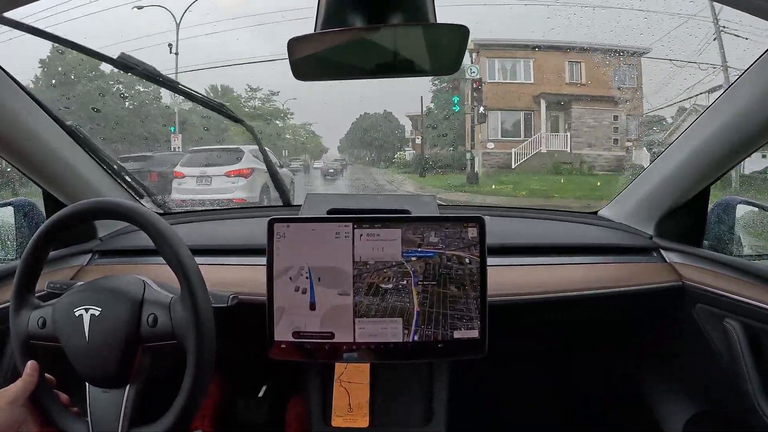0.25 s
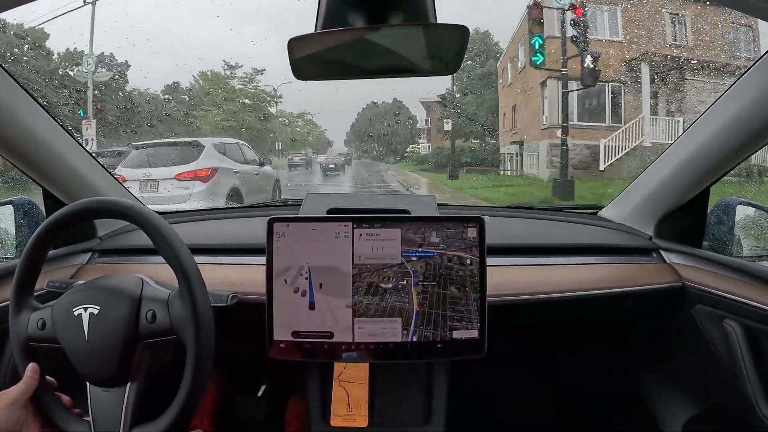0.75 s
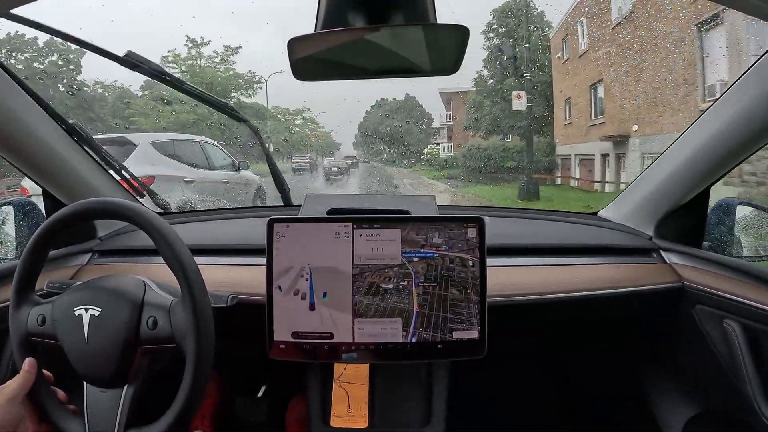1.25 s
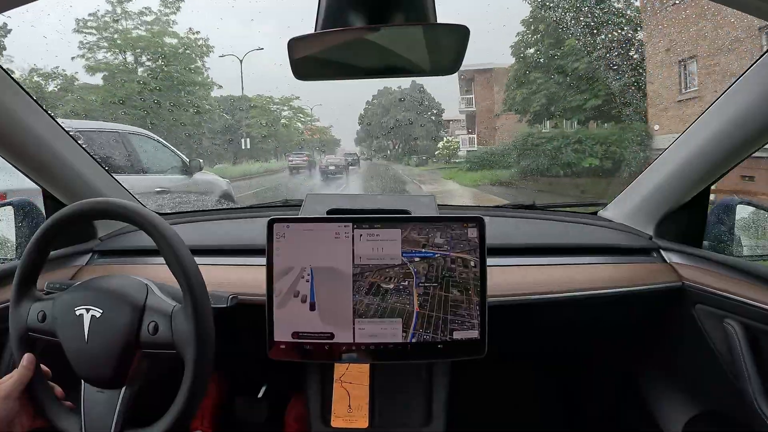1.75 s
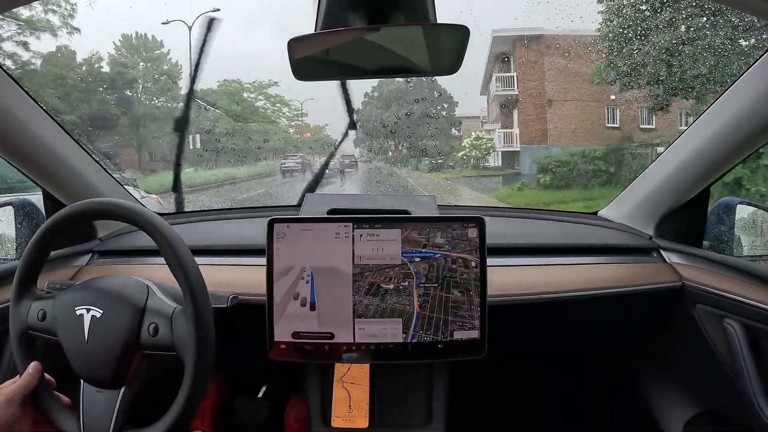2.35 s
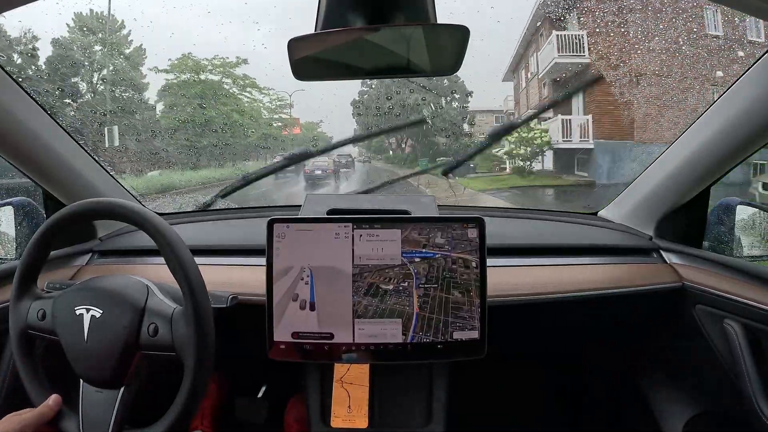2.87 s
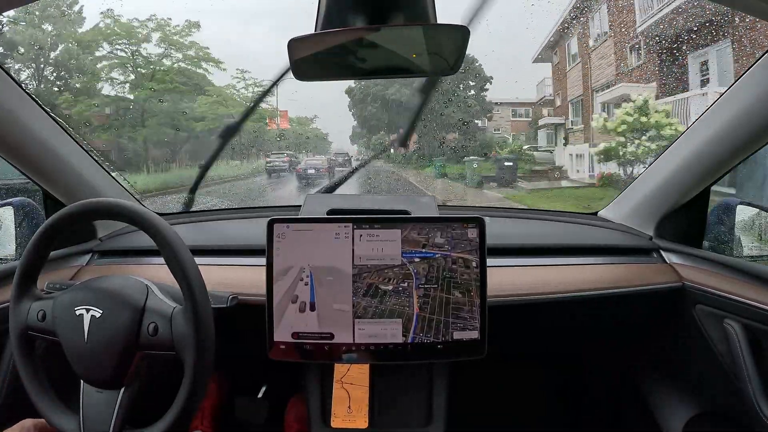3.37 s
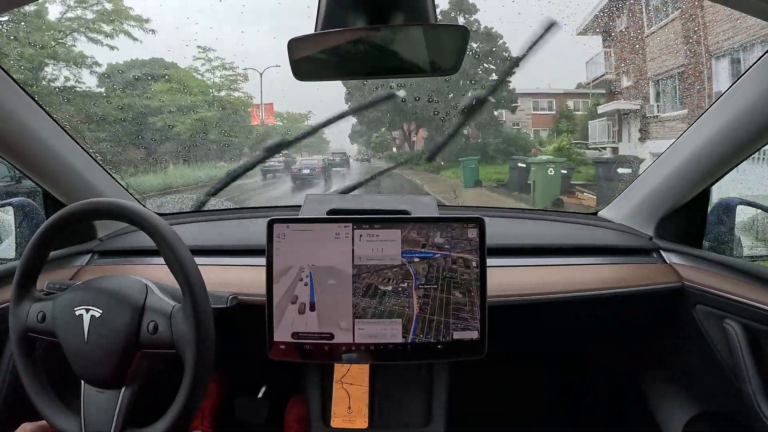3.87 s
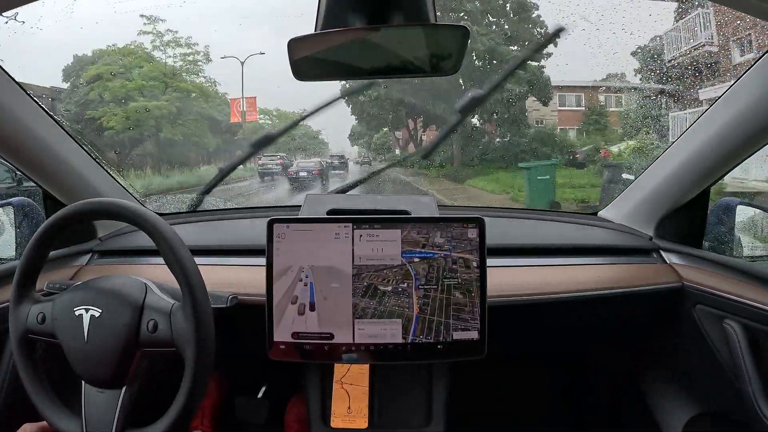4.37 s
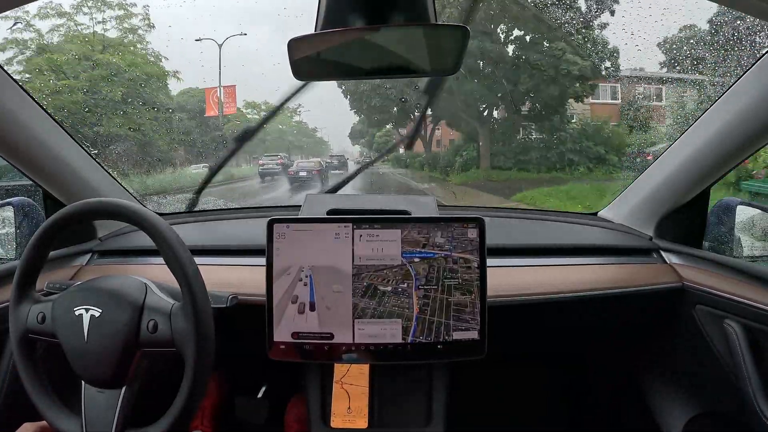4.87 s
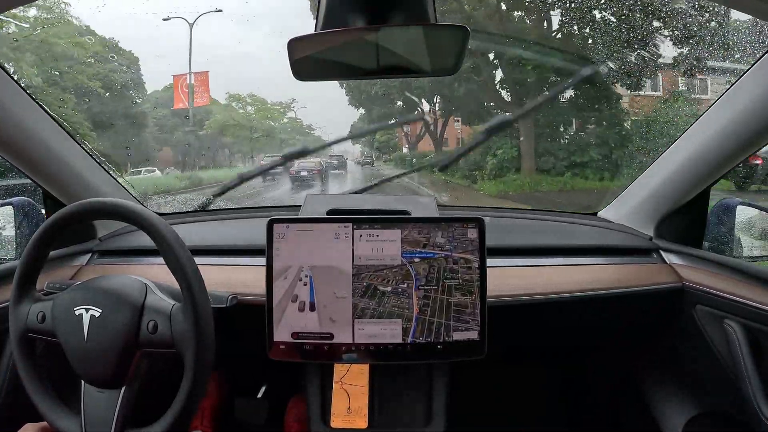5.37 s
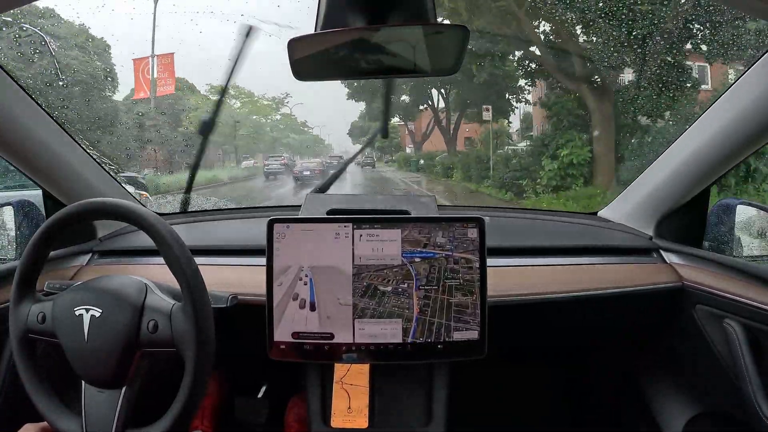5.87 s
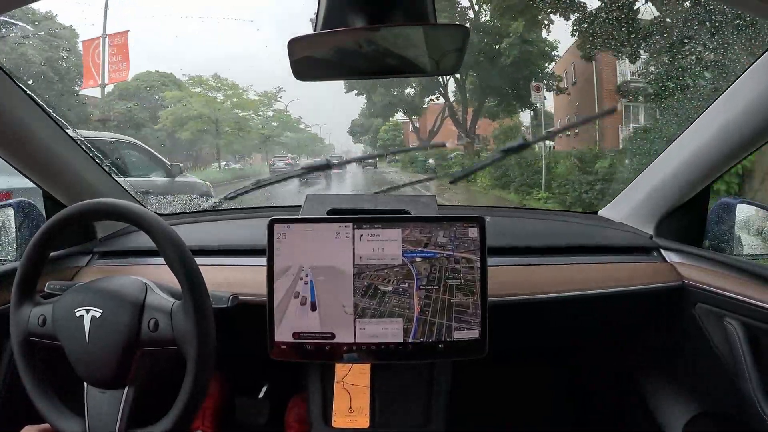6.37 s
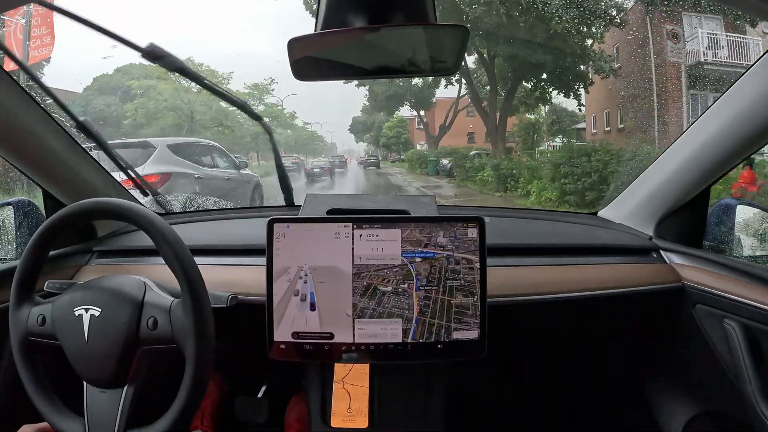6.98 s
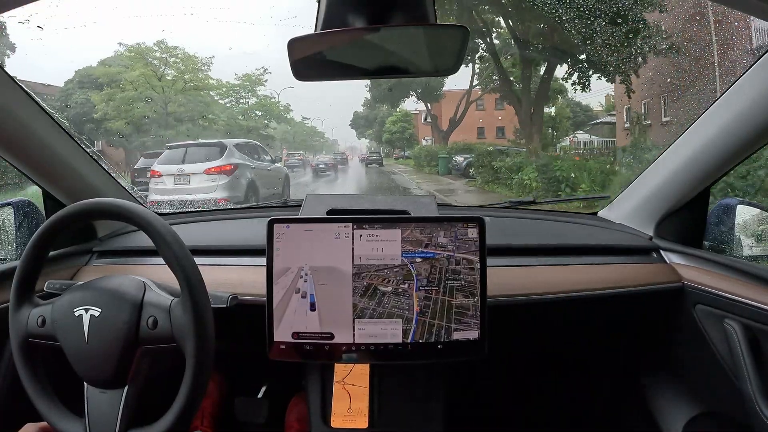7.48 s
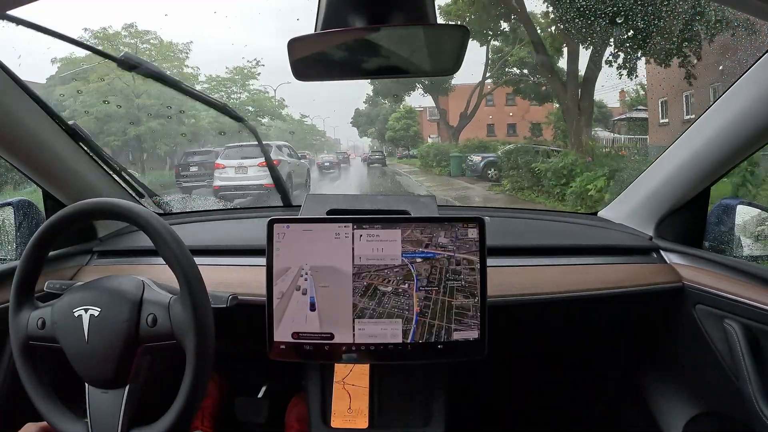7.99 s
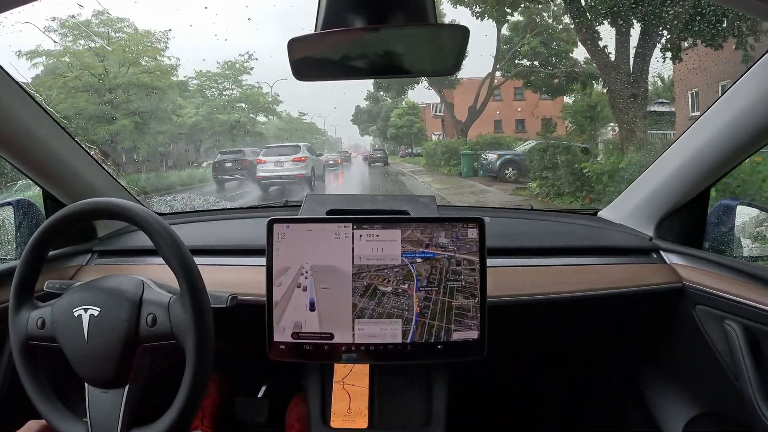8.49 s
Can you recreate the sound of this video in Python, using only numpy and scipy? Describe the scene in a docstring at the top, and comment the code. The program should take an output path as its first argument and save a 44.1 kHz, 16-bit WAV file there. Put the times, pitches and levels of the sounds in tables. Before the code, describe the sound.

From the start, a deep, throbbing boom and tyre roar fill an electric car in heavy rain, heard from between the front seats. Above the rumble, wet tyres hiss and fine rain sizzles on the windscreen. The wipers turn about every half second throughout, alternating a soft thud and a knock with a dull rubber scuff, stronger after 3 seconds. A road seam thumps through the floor at 1.7 seconds and the boom swells. From 5 to 6.5 seconds a subtle tyre hum sinks as the car slows. Between 6.4 and 7.2 seconds the fine rain thins under a tree and fat drops splat on the glass, while two seam thumps and small trim knocks land around 7 seconds. The rain is quietest near 7.5 seconds, then builds again. A very faint, high drive whine grows slowly, and a light bump with trim knocks comes at about 8.7 seconds.

```python
"""A low boom and a tyre roar fill an electric car driving through heavy rain, as the road shakes its cabin.
Wet tyres hiss, fine rain sizzles on the windscreen and the wipers thud softly at each turn.
Seams in the road thump through the floor, the trim knocks and the drive whines faintly.
Under a tree the fine rain thins out and fat drops splat on the glass; the tyre hum sinks as the car slows.
"""
import sys
import numpy as np
from scipy import signal
from scipy.fft import rfft, irfft, next_fast_len
from scipy.io import wavfile
from scipy.ndimage import uniform_filter1d, minimum_filter1d

SR = 44100
rng = np.random.default_rng(int(sys.argv[2]) if len(sys.argv) > 2 else 0)


def int16_out(signal):
    """Quantize to a 16-bit WAV file."""
    q = np.round(np.clip(np.atleast_2d(signal).T, -1, 1) * 32767)
    wavfile.write(sys.argv[1], SR, q.astype(np.int16))


N = 385434
TIME = np.arange(N) / SR

# Relative levels of the water on the road and on the glass: time_s, spray_db, rain_db
WATER_LEVELS = [(0.0, -41, -47), (0.07, -52, -53), (0.22, -52.5, -57), (0.45, -51, -53),
                (0.7, -50.5, -51.5), (0.93, -50.5, -53), (1.08, -49.5, -50), (1.35, -50, -52.5),
                (1.65, -50.5, -52), (2.33, -53, -55), (2.8, -49, -53), (2.95, -50.5, -53),
                (3.12, -48.5, -50.8), (3.55, -50.5, -54), (3.88, -48, -51.5), (4.1, -48.5, -51.5),
                (4.35, -46.5, -50), (4.58, -49, -54), (5.7, -48, -53.5), (6.22, -48.5, -55),
                (6.38, -52, -57), (6.8, -52.5, -56), (7.27, -52.5, -57.5), (7.36, -55, -63.5),
                (7.49, -54, -66), (7.63, -53, -61.5), (7.95, -51, -58), (8.55, -50.3, -58),
                (8.74, -48.5, -55.5)]
# Wiper reversals, top and foot of the sweep by turns: time_s, strength_db, cutoff_hz, other_blade_lag_s
WIPER_REVERSALS = [(0.449, -29, 500, .014), (0.958, -31, 600, -0.012), (1.427, -28, 500, -.017),
                   (1.916, -42, 500, .014), (2.389, -30.5, 360, .014), (2.85, -33, 800, .014),
                   (3.365, -25.5, 520, -.013), (3.829, -30, 550, 0.021), (4.334, -21, 380, -.016),
                   (4.779, -26, 800, -0.011), (5.313, -20, 320, .035), (5.74, -26, 600, 0.011),
                   (6.288, -23.5, 540, -.008), (6.68, -26.5, 650, 0.019), (7.262, -27, 380, .014),
                   (7.687, -25.5, 600, 0.017), (8.226, -21.5, 340, -.012), (8.668, -30, 694, -.014)]


def road(boom_db=-22, roar_trim_db=-1, drone_trim_db=-1, waver_db=1.5, attack_s=.058, release_s=.077):
    """Forced vibration: the uneven road makes the cabin air boom, the tread roar and the panels drone."""
    # Rough stretches that pump the air mode: start_s, length_s, level_db
    rough_patches = [(0.0, 0.205, -14.5), (0.406, 0.03, -19), (1.159, 0.11, -15.3), (1.735, 0.58, -17),
                     (2.994, 0.033, -22), (3.287, 0.058, -15.5), (4.475, 0.57, -25), (6.217, 0.14, -17.5),
                     (6.475, 0.82, -20.5)]
    # Smooth stretches where the boom sinks: start_s, length_s, change_db
    smooth_patches = [(1.4, .04, -5), (2.46, 0.19, -4), (3.197, 0.03, -12), (7.422, 0.51, -3.5)]
    # Coarseness of the surface, as relative levels: time_s, roar_db, drone_db
    coarseness = [(0.0, -25, -36.5), (0.12, -34, -43.5), (0.3, -36.5, -46), (0.7, -35.5, -45),
                  (1.0, -33.5, -45), (1.7, -34, -40), (2.1, -36.5, -45.5), (2.7, -36, -41.5),
                  (4.35, -30.5, -41.5), (4.6, -33, -41), (5.5, -31.5, -42), (6.5, -30.5, -44.5),
                  (7.15, -33, -44), (7.42, -38.5, -47), (7.85, -32.5, -46.5), (8.45, -34, -44.5),
                  (8.74, -28, -42)]
    # Spectra of cabin air, tread and body panels: frequency_hz, density_db
    boom_spectrum = [(10, -24), (20, -4.5), (28, -1), (36, 3), (44, -1), (53, -12.5), (64, -15.5),
                     (76, -21.5), (95, -28.5), (130, -83.5), (2000, -140)]
    roar_spectrum = [(40, -32), (62, -8.5), (78, -2), (95, -3), (112, 1), (135, -3.5), (165, -8.5),
                     (210, -18), (320, -46), (600, -71), (4000, -140)]
    drone_spectrum = [(120, -14.5), (185, 1), (220, -1), (250, 1), (280, -3), (320, -1.5), (370, -9),
                      (440, -16), (600, -38), (1000, -42), (10000, -120)]
    pumping = sum(from_db(db) * envelope(s, length, attack_s, release_s)
                  for s, length, db in rough_patches)
    dip_db = sum(db * envelope(s, length, release_s, attack_s) for s, length, db in smooth_patches)
    roar_db, drone_db = in_time(coarseness)
    boom = noise(boom_spectrum)
    boom_power = uniform_filter1d(boom[0] ** 2, int(.16 * SR))
    boom = from_db(boom_db + dip_db) * boom / np.sqrt(boom_power + .0097)  # only quick throbs remain
    resonance = pumping * air_mode()
    roar = from_db(roar_db + roar_trim_db + waver_db * drift(4.8)) * noise(roar_spectrum)
    drone = from_db(drone_db + drone_trim_db + waver_db * drift(4.5)) * noise(drone_spectrum)
    return boom + resonance + roar + drone


def air_mode(pitch_hz=35, wander_hz=5, throb_db=1.2):
    """Cavity resonance: the cabin's lowest air mode, driven hard, wavers in pitch and strength."""
    phase = 2 * np.pi * np.cumsum(pitch_hz + wander_hz * drift(16)) / SR
    return unit_rms(from_db(throb_db * drift(6)) * np.sin(phase))


def seams(level_db=-2, tyre_cutoff_hz=220):
    """Impulse response: the soft tyre low-passes each blow from a seam; suspension and floor ring."""
    # Wheels dropping over seams: time_s, strength_db
    crossings = [(0.07, -39), (1.72, -19), (6.27, -32), (6.95, -23.5), (7.07, -19.5), (8.65, -30)]
    # Modes of suspension and floor: pitch_hz, gain_db, t60_s
    floor_modes = [(70, 1.5, 0.48), (102.4, -5, 0.15), (163, -13.5, 0.077)]
    blows = soften(clicks(crossings), tyre_cutoff_hz)
    return from_db(level_db) * sum(from_db(db) * ring(blows, hz, t60) for hz, db, t60 in floor_modes)


def spray(hiss_trim_db=2, wash_trim_db=2, wash_follows=.71, flutter_db=1, grain_db=-6):
    """Turbulence and impact noise: tyres cut the water film; the wheel-arch wash grows with the rain."""
    # Spectra of the spray and the duller wash: frequency_hz, density_db
    spray_spectrum = [(350, -35), (600, -7.5), (800, -5), (1000, 0.5), (1300, -2), (1750, -4), (2300, -8),
                      (2750, -8), (3400, -8), (4000, -9.5), (4500, -13.5), (7000, -26.5), (14000, -62)]
    wash_spectrum = [(150, -41.5), (330, -14.5), (420, -0.5), (490, 1.5), (570, -2), (640, -5), (760, -3.5),
                     (900, -7.5), (1200, -24), (2500, -49.5), (12000, -88.5)]
    spray_db, rain_db = in_time(WATER_LEVELS)
    wash_db = np.median(rain_db) + wash_follows * (rain_db - np.median(rain_db))
    droplets = unit_rms(in_cabin(drops(per_s=2000, spread_db=2.5), wet_db=-.5, t60=.05))
    excitation = rng.standard_normal((2, N)) + from_db(grain_db) * droplets
    hiss = from_db(spray_db + hiss_trim_db) * unit_rms(two_ears(excitation, spray_spectrum))
    flutter = from_db(flutter_db * drift(26))
    wash = from_db(wash_db + wash_trim_db) * noise(wash_spectrum)
    return flutter * (hiss + wash)


def rain(trim_db=3, drops_per_s=5000, gust_db=1.14, flurry_db=.5, shelter_db=-3.5):
    """Shot noise on the windscreen: heavier rain brings more and harder drops; a tree holds some back."""
    # Spectrum of fine drops on glass: frequency_hz, density_db
    rain_spectrum = [(400, -20.5), (1200, 1), (2500, -2.5), (4000, -2.5), (5300, 0.5), (6500, -2),
                     (7750, -4.5), (8100, -9.5), (9000, -11), (10000, -14.5), (11000, -23), (13000, -28),
                     (15500, -38)]
    _, rain_db = in_time(WATER_LEVELS)
    under_tree = envelope(start_s=6.42, length_s=.76, attack_s=.1, release_s=.1)
    rain_db = rain_db + shelter_db * under_tree
    vigour = from_db(rain_db - np.median(rain_db))
    impacts = np.sqrt(vigour) * drops(drops_per_s * vigour, spread_db=3.5)
    flurries = from_db(gust_db * drift(52) + flurry_db * drift(5.3))
    sizzle = two_ears(in_cabin(impacts * flurries, wet_db=0, t60=.094), rain_spectrum)
    overall_rms = from_db(trim_db) * np.sqrt(np.mean(from_db(rain_db) ** 2))
    return overall_rms * unit_rms(sizzle)


def wipers(trim_db=0, judder_db=-10, judder_t60=.08, left_db=.8):
    """Modal ringing: flipping blades judder and strike the glass, a thud at the top, a knock below."""
    # Modes of the windscreen at either end of the sweep: pitch_hz, top_db, foot_db, t60_s
    screen_modes = [(120, -1, 0, 0.07), (160, -1, -3, 0.04), (254, -0.5, -13, 0.06), (290, -4.5, -7, 0.05),
                    (392, -10, -15, 0.035), (508, -19, -9, 0.028), (635, -14, -11, 0.02),
                    (780, -19, -8, 0.02)]
    flips = [blade_flip(*turn) for turn in WIPER_REVERSALS]
    at_top, at_foot = sum(flips[0::2]), sum(flips[1::2])
    thud = 0
    for k, (hz, top_db, foot_db, t60) in enumerate(screen_modes):
        force = from_db(top_db) * at_top + from_db(foot_db) * at_foot
        thud = thud + (-1) ** k * ring(force, hz, t60)
    impulse = clicks([(.00045, .0059)])
    judder = np.array([echoes(impulse, judder_t60) for _ in range(2)])
    thud = thud + from_db(judder_db) * signal.fftconvolve(judder, thud[None], axes=1)[:, :N]
    return from_db(trim_db + np.array([[left_db], [-left_db]])) * thud


def blade_flip(time_s, strength_db, cutoff_hz, lag_s, other_blade_db=-6):
    """Soft contact: two blades flop over a moment apart, and the rubber rounds off each slap."""
    slaps = clicks([(time_s, strength_db), (time_s + lag_s, strength_db + other_blade_db)])
    return soften(slaps, cutoff_hz)


def scuffs(relative_db=-17.5, swell_s=.018):
    """Friction noise: around each turn the rubber brushes the wet glass in a brief, dull swell."""
    # Spectrum of rubber on wet glass: frequency_hz, density_db
    scuff_spectrum = [(70, -28), (170, -6), (270, 0), (340, -3), (450, -13), (750, -17), (1100, -29),
                      (3000, -65), (10000, -100)]
    swell = sum(from_db(db + relative_db) * np.exp(-np.abs(TIME - s) / swell_s)
                for s, db, _, _ in WIPER_REVERSALS)
    return swell * noise(scuff_spectrum)


def splats(trim_db=5.5, splash_db=-15.5):
    """Impact and splash: a fat drop cracks on the glass, then its droplets scatter for milliseconds."""
    # Fat drops, most of them from the tree: time_s, strength_db, scatter_s
    fat_drops = [(1.071, -34, .012), (4.587, -33, 0.029), (5.629, -35, .008), (6.436, -33, 0.013),
                 (6.464, -30, .008), (6.546, -34, .008), (6.556, -31.5, .013), (6.607, -33.5, 0.016),
                 (6.638, -31, 0.0065), (6.648, -35, .007), (6.667, -24.5, 0.0015), (6.683, -32, .007),
                 (6.695, -36, 0.013), (6.715, -34, 0.0052), (6.756, -40, 0.016), (6.786, -36, 0.0037),
                 (6.845, -37.5, 0.01), (6.861, -28.5, 0.0066), (6.932, -37, 0.0054), (6.985, -34.5, .004),
                 (6.995, -33.5, 0.015), (7.069, -34, 0.01), (7.093, -36, .01), (7.136, -31.5, 0.0073),
                 (7.149, -37, .004), (7.177, -33.5, .007), (7.228, -39, .025), (7.636, -37, .005)]
    # Spectrum of a splat: frequency_hz, gain_db
    splat_spectrum = [(300, -24), (800, 7.5), (1400, 8.5), (2400, 4), (4000, 4), (7500, 0), (8300, -6.5),
                      (10000, -12), (12000, -26), (16000, -29)]
    scatter = sum(from_db(db) * np.exp(-np.abs(TIME - s) / scatter_s) * (TIME >= s)
                  for s, db, scatter_s in fat_drops)
    splash = scatter * unit_rms(drops(per_s=9000, spread_db=1.8))
    impacts = clicks([(s, db) for s, db, _ in fat_drops]) + from_db(splash_db) * splash
    return two_ears(in_cabin(from_db(trim_db) * impacts, wet_db=-4, t60=.049), splat_spectrum)


def tread_hum(sag_per_s=.165, waver_hz=5, edge_s=.42):
    """Periodic excitation: the tread's wavering tones sink in proportion as the car slows."""
    # Tones of the tread: start_s, length_s, start_pitch_hz, level_db
    tread_tones = [(5.05, 1.42, 101.7, -34.5), (4.98, 0.37, 361, -51)]
    hum = 0
    for s, length, hz, db in tread_tones:
        phase = 2 * np.pi * np.cumsum(hz * (1 - sag_per_s * (TIME - s))) / SR
        tone = drift(waver_hz) * np.sin(phase) + drift(waver_hz) * np.cos(phase)
        hum = hum + from_db(db) * envelope(s, length, edge_s, edge_s) * tone
    return hum


def knocks(rattle_db=-3):
    """Damped vibration: trim panels knock and buzz briefly as the body flexes."""
    # Knocks of the trim: time_s, strength_db, pitch_hz, t60_s
    trim_hits = [(6.995, -33, 1320, 0.013), (7.178, -31, 1190, 0.0083), (8.673, -23, 644, 0.0064),
                 (8.723, -32.5, 1800, 0.032)]
    sound = 0
    for s, db, hz, t60 in trim_hits:
        hit = clicks([(s, db)])
        rattle = np.array([echoes(hit, t60=.039), echoes(hit, t60=.037)])
        sound = sound + ring(hit + from_db(rattle_db) * rattle, hz, t60)
    return sound


def panel_hum(pitch_hz=316, level_db=-51):
    """Plate resonance: one randomly shaken body panel sings in a narrow band while the car is at speed."""
    tone = unit_rms(ring(rng.standard_normal(N), pitch_hz, t60=.08))
    return from_db(level_db) * envelope(start_s=2.5, length_s=1.4, attack_s=.6, release_s=.6) * tone


def whines(start_db=-17, rise_db_per_s=2.5):
    """Narrow-band noise: thin, unsteady tones of the drive grow louder as the car eases off."""
    # Whines of the drive: pitch_hz, bandwidth_hz, relative_db
    bands = [(3300, 250, -70), (4080, 50, -71)]
    tones = 0
    for hz, bandwidth_hz, db in bands:
        t60 = np.log(1000) / (np.pi * bandwidth_hz)
        tones = tones + from_db(db) * unit_rms(ring(rng.standard_normal((2, N)), hz, t60))
    return from_db(start_db + rise_db_per_s * TIME) * tones


def drops(per_s, spread_db):
    """Poisson process: independent impacts, many small and a few large."""
    sizes = from_db(spread_db * np.minimum(rng.exponential(1, N), 5))
    return (rng.random(N) < per_s / SR) * sizes * rng.choice([-1, 1], N)


def in_cabin(x, wet_db, t60):
    """Direct and diffuse field as mid and side: the side holds reflections only."""
    wet = from_db(wet_db)
    mid = (x + wet * echoes(x, t60)) / np.hypot(1, wet)
    return np.array([mid, echoes(x, t60)])


def echoes(x, t60):
    """Reverberation: each click sets off dense, dying reflections with as much energy as itself."""
    retained = from_db(-60 / (t60 * SR)) ** 2
    energy = signal.lfilter([1 - retained], [1, -retained], x ** 2 + 1e-18)
    return np.sqrt(energy) * rng.standard_normal(N)


def two_ears(mid_side, spectrum):
    """Interaural coherence: mid and side become left and right, alike in the bass, wider in the treble."""
    # How much the ears differ: frequency_hz, side_over_mid_db
    width = [(30, -38), (70, -31), (125, -19.5), (220, -21), (400, -10.5), (700, -10), (1400, -9.5),
             (2600, -5), (5000, -10), (10000, -11)]
    mid, side = mid_side[0], colour(mid_side[1], width)
    return colour(np.array([mid + side, mid - side]), spectrum)


def noise(spectrum):
    """Filtered Gaussian noise, stereo, of rms 1."""
    return unit_rms(two_ears(rng.standard_normal((2, N)), spectrum))


def colour(x, spectrum):
    """Minimum-phase filter that follows rows of frequency_hz, gain_db."""
    size = 2 * next_fast_len(N // 2 + SR // 8, real=True)
    hz, db = np.transpose(spectrum)
    grid_hz = np.maximum(np.arange(size // 2 + 1) * SR / size, 1)
    gain = from_db(np.interp(np.log(grid_hz), np.log(hz), db))
    cepstrum = irfft(np.log(gain))
    cepstrum[1:size // 2] *= 2  # folding the cepstrum makes the filter causal
    cepstrum[size // 2 + 1:] = 0
    return irfft(rfft(x, size) * np.exp(rfft(cepstrum)))[..., :N]


def ring(x, hz, t60):
    """Damped resonator: a unit click starts a decaying sine of height 1."""
    radius, angle = from_db(-60 / (t60 * SR)), 2 * np.pi * hz / SR
    return signal.lfilter([0, np.sin(angle)], [1, -2 * radius * np.cos(angle), radius ** 2], x + 1e-18)


def soften(x, cutoff_hz):
    """Compliance acts as a second-order low-pass on a blow."""
    return signal.sosfilt(signal.butter(2, cutoff_hz, fs=SR, output="sos"), x + 1e-18)


def clicks(rows):
    """One impulse for each row of time_s, level_db."""
    impulses = np.zeros(N)
    for s, db in rows:
        impulses[int(s * SR)] += from_db(db)
    return impulses


def drift(rate_hz, hop=40):
    """Random modulation: low-passed noise of rms 1."""
    pole = np.exp(-2 * np.pi * rate_hz * hop / SR)
    slow = signal.lfilter([1], [1, -2 * pole, pole ** 2], rng.standard_normal(N // hop + 2002))[2000:]
    return np.interp(np.arange(N) / hop, np.arange(len(slow)), unit_rms(slow))


def envelope(start_s, length_s, attack_s, release_s):
    """Trapezoid from 0 to 1: attack, hold, release."""
    rise = (TIME - start_s) / attack_s + .5
    fall = (start_s + length_s - TIME) / release_s + 1
    return np.clip(np.minimum(rise, fall), 0, 1)


def in_time(rows):
    """Linear interpolation of each column after time_s, sample by sample."""
    times, *columns = np.transpose(rows)
    return [np.interp(TIME, times, column) for column in columns]


def from_db(db):
    """Decibels to amplitude gain."""
    return 10 ** (np.asarray(db) / 20)


def unit_rms(x):
    """Scale to rms 1."""
    return x / np.sqrt(np.mean(x ** 2) + 1e-20)


def limiter(x, ceiling_db=-8.3, release_db_per_s=60, smoothing_s=.008):
    """Peak limiting: strong booms push the whole sound down for a moment."""
    over_db = np.maximum(20 * np.log10(np.abs(x).max(axis=0) + 1e-9) - ceiling_db, 0)
    recovery_db = release_db_per_s * TIME
    held_db = np.maximum.accumulate(over_db + recovery_db) - recovery_db
    window = int(smoothing_s * SR)
    return x * from_db(uniform_filter1d(minimum_filter1d(-held_db, window), window))


def scene():
    """Superposition of all sources, heard from between the front seats."""
    rolling = road() + tread_hum() + panel_hum() + seams()
    water = spray() + rain() + splats()
    return rolling + water + wipers() + scuffs() + knocks() + whines()


def record(dry, cutoff_hz=15500):
    """Balance and band limit: the bass leans slightly left, peaks are limited and the top is cut."""
    # Level difference between the channels: frequency_hz, left_over_right_db
    balance = [(40, 0.96), (90, 0.5), (170, 0.5), (350, 1), (700, 0.6), (1500, -0.1), (3000, 0.1),
               (5500, 0.8), (10000, -1)]
    left = colour(dry[0], [(hz, db / 2) for hz, db in balance])
    right = colour(dry[1], [(hz, -db / 2) for hz, db in balance])
    lowpass = signal.ellip(10, .1, 80, cutoff_hz, fs=SR, output="sos")
    return signal.sosfilt(lowpass, limiter(np.array([left, right])))


dry = scene()
out = record(dry)
int16_out(out)
```